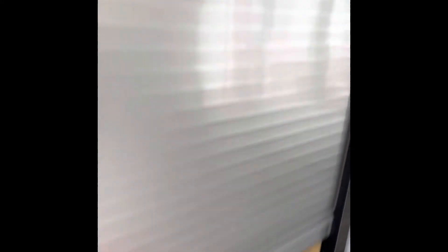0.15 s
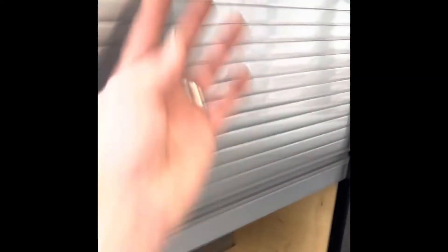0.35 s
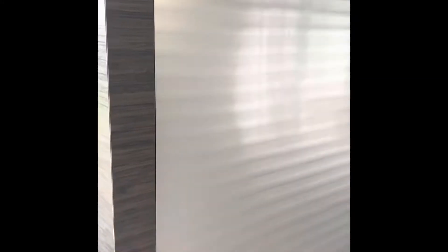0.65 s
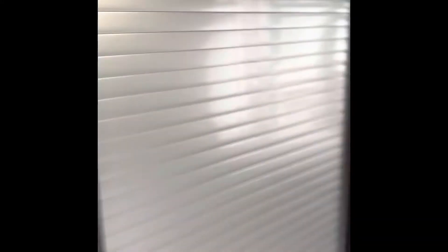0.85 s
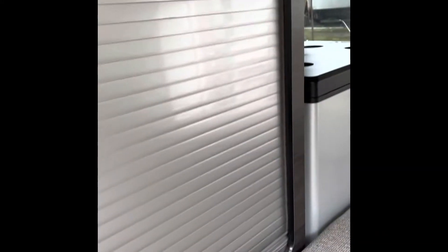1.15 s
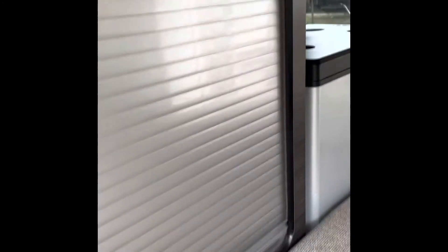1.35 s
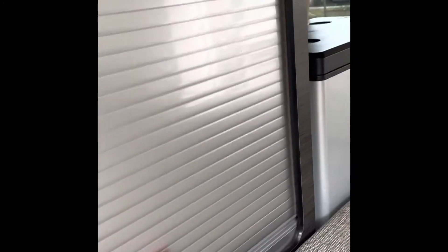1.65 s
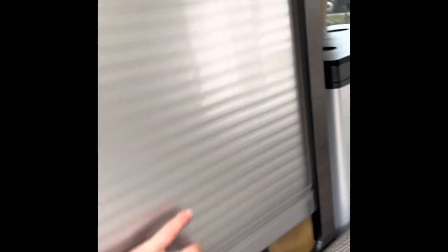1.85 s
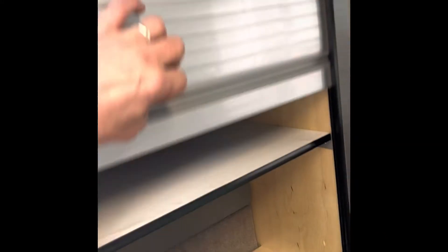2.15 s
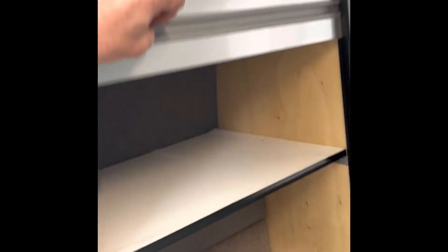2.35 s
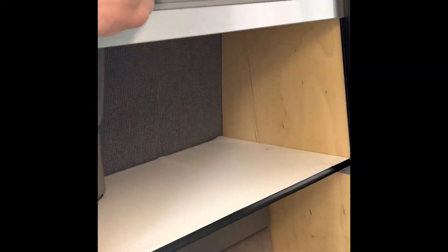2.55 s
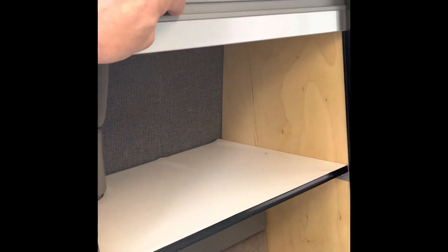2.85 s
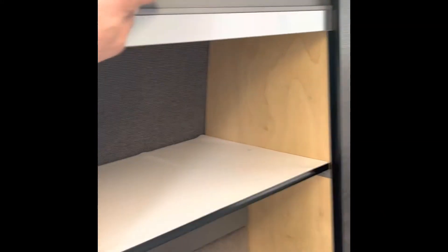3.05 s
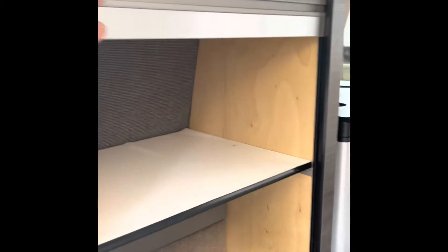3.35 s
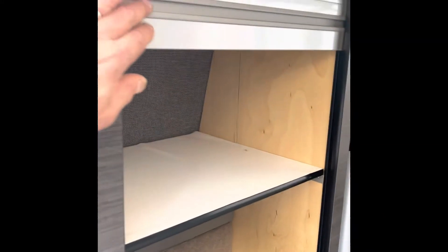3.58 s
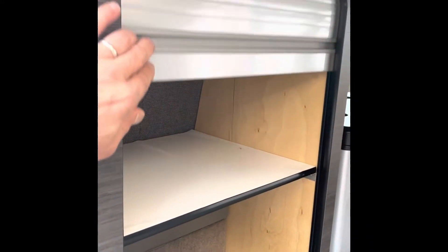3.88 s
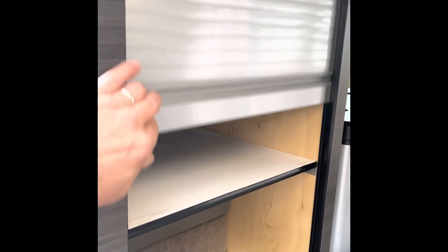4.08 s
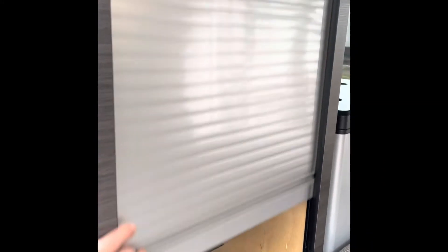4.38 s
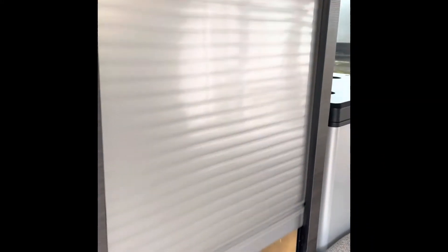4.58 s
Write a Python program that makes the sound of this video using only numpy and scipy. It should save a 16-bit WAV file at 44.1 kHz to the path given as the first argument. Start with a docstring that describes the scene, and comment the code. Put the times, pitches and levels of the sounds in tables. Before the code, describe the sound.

Inside a small camper, a hand pulls a cabinet's slatted roll-up door down in two quick, rattling slides, and it shuts with a sharp, woody knock. Fingers tap lightly on it, then the slats rush upward with a hissing clatter. After a short pause with faint clicks, the door slides down again more gently. The sound is close and fairly dry, over a soft low outdoor rumble.

```python
"""Inside a small camper, a hand works the slatted roll-up door of a wooden cabinet, close by. A low outdoor
rumble fills the cabin. The door slides three times: its slats hiss and clatter along their tracks, shaking the
door and the cabinet and making the air inside hum. The door knocks shut once and fingers tap and thump on it:
each blow rings the wood, while slat edges and fingernails click and the slats now and then squeal briefly."""
import sys
import numpy as np
from scipy import signal
from scipy.fft import rfft, irfft, next_fast_len
from scipy.io import wavfile
from scipy.ndimage import uniform_filter1d

SR = 44100
rng = np.random.default_rng(int(sys.argv[2]) if len(sys.argv) > 2 else 0)


def transcribe(signal):
    """Save signal, clipped to [-1, 1], as a 16-bit WAV file at the path in sys.argv[1]."""
    frames = np.atleast_2d(signal).T
    limited = np.clip(frames, -1, 1)
    pcm = np.round(limited * 32767).astype(np.int16)
    wavfile.write(sys.argv[1], SR, pcm)


N = 208363


def gain_of(db):
    """Turns decibels into a volume factor."""
    return 10 ** (np.asarray(db) / 20)


def evened(x):
    """Scales a sound to an average (rms) level of 1."""
    return x / np.sqrt(np.mean(x ** 2) + 1e-20)


def level_at(points, hz):
    """Looks up a (frequency, level) table, with octaves evenly spaced."""
    point_hz, db = np.transpose(points)
    return np.interp(np.log(hz + 1), np.log(point_hz + 1), db)


def follow(rows):
    """Turns a table that starts with a time column into one curve per other column."""
    times, *columns = np.transpose(rows)
    return (np.interp(np.arange(N) / SR, times, column) for column in columns)


def add(mix, start_s, sound):
    """Mixes a sound in at a given time."""
    part = mix[round(start_s * SR):][:len(sound)]
    part += sound[:len(part)]


def coloured(x, points):
    """Shapes a sound's tone by a (frequency, level) table, cutting the bass below its first row."""
    hz = np.fft.rfftfreq(len(x), 1 / SR)
    closed = [(points[0][0] / 2, points[0][1] - 30)] + list(points)
    return irfft(rfft(x) * gain_of(level_at(closed, hz)), len(x))


def resonant(x, modes):
    """Lets a sound ring an object's modes, its natural tones; narrow ones ring longer."""
    out = np.zeros(len(x))
    for k, (hz, width, db) in enumerate(modes):
        pole = np.exp(-np.pi * width / SR + 2j * np.pi * hz / SR)
        out += (-1) ** k * gain_of(db) * signal.lfilter([1 - abs(pole)], [1, -pole], x).imag
    return out


def gliding(x, modes, pitch):
    """Rings modes whose frequencies are all multiplied by one pitch curve."""
    out, turns = np.zeros(N), np.cumsum(pitch) / SR
    for k, (hz, width, db) in enumerate(modes):
        spin = np.exp(2j * np.pi * hz * turns)
        decay = np.exp(-np.pi * width / SR)
        ring = spin * signal.lfilter([1 - decay], [1, -decay], x / spin)
        out += (-1) ** k * gain_of(db) * ring.imag
    return out


def wander(per_s):
    """A smooth random curve that changes about per_s times a second."""
    span = max(int(SR / per_s), 1)
    return evened(uniform_filter1d(uniform_filter1d(rng.standard_normal(N), span), span))


def grit(per_s, spread_db):
    """Tiny random impacts of uneven size."""
    size = gain_of(spread_db * np.minimum(rng.exponential(1, N), 5)) * rng.choice([-1., 1.], N)
    return evened(size * (rng.random(N) < per_s / SR))


def patchy(x, depth_db):
    """Makes different frequency bands swell and sag on their own."""
    bands = signal.stft(x, nperseg=512, noverlap=384)[2]
    patches = uniform_filter1d(rng.standard_normal(bands.shape[::-1]), size=14, axis=0)  # over time
    patches = uniform_filter1d(patches, size=5, axis=1)  # over frequency
    bands = bands * gain_of(depth_db * evened(patches).T)
    return evened(signal.istft(bands, nperseg=512, noverlap=384)[1][:N])


def cabin_rumble():
    """Low outdoor noise fills the cabin, swaying slightly in level."""
    # tone of the rumble: (frequency [Hz], level [dB])
    rumble_tone = [(30, -19.5), (55, 7.5), (100, 1), (290, -15.5), (1030, -18.5), (1600, -26),
                   (2300, -32.5), (3000, -41), (5000, -48.5), (8000, -68.5), (12000, -53), (15700, -93)]
    return gain_of(-43.5 + wander(15)) * evened(coloured(rng.standard_normal(N), rumble_tone))


def wall_echoes(x, fade_s):
    """The cabin walls scatter a sound into a short tail that falls 60 dB in fade_s."""
    t = np.arange(SR // 8) / SR
    tail = rng.standard_normal(len(t)) * gain_of(-60 * t / fade_s)
    return signal.oaconvolve(x, tail / np.linalg.norm(tail))[:N]


def door_motion():
    """Hiss level, dullness and treble level as the hand slides the door or brushes it at rest."""
    # one list per slide (down in two pulls, up, down): (time [s], hiss [dB], dullness [0-1], treble [dB])
    slides = [
        [(0, -41.5, 0.5, -47), (.07, -39.5, 0.3, -51), (.16, -38.5, 0.4, -46), (.22, -34, 0.6, -48),
         (.27, -44.5, 0.84, -57.5), (.33, -58.5, 0.8, -68.5), (.45, -54, 0.1, -59.5), (.56, -46.5, 0.65, -56.5),
         (.635, -47, 0.95, -54.5), (.65, -43, 0.9, -52.5), (.72, -37.5, 0.06, -46), (.75, -32, .8, -42),
         (.786, -33, 0.7, -52), (.803, -34.5, .95, -62), (.822, -41, .95, -63), (.852, -59, 0.93, -73.5),
         (1.0, -64.5, 1, -75)],
        [(1.62, -53.5, 0.1, -65), (1.72, -50.5, 0, -58), (1.74, -41, 0.7, -56.5), (1.89, -37.5, 0.55, -45.5),
         (2.0, -32, 0, -43.5), (2.14, -37, 0.8, -51), (2.29, -34.5, 0.7, -49.5), (2.36, -37, 0.8, -50.5),
         (2.42, -42, 0.87, -57), (2.5, -59, 1, -69.5)],
        [(3.7, -58.5, 0.72, -75), (3.8, -56, 0.8, -66), (3.88, -52, 0.6, -62), (4.1, -49, 0.7, -57.5),
         (4.14, -39.5, 0.3, -52), (4.23, -37, 0, -51), (4.28, -39.5, 0.2, -53), (4.335, -48, 0.4, -52.5),
         (4.36, -44.5, 0.84, -54), (4.44, -55, 0.6, -58), (4.56, -47.5, 0.1, -56.5), (4.72, -50.5, 0.8, -54.5)],
    ]
    # light brushes of the hand: (centre time [s], half length [s], hiss [dB], treble [dB])
    brushes = [(1.178, 0.091, -58.5, -66.5), (1.403, 0.074, -60, -65.5), (1.566, 0.051, -50.5, -60),
               (2.557, 0.13, -63.5, -69.5), (2.797, 0.017, -59.5, -63.5), (2.87, 0.12, -71, -79.5),
               (3.006, 0.031, -76, -70), (3.079, 0.094, -77.5, -82), (3.312, 0.032, -61.5, -67),
               (3.608, 0.034, -60.5, -78)]
    rest_db, rest_dullness, settle_s = -103, 0.28, 0.06
    rest = (rest_db, rest_dullness, rest_db)
    t, rows = np.arange(N) / SR, []
    for slide in slides:
        rows += [(slide[0][0] - settle_s, *rest), *slide, (slide[-1][0] + settle_s, *rest)]
    hiss_db, dullness, treble_db = follow(rows)
    for centre_s, half_s, brush_db, brush_treble_db in brushes:
        swell_db = -12 * (np.sqrt(1 + ((t - centre_s) / half_s) ** 2) - 1)  # round top, gentle sides
        hiss_db = np.maximum(hiss_db, brush_db + swell_db)
        treble_db = np.maximum(treble_db, brush_treble_db + swell_db)
    return hiss_db, np.clip(dullness, 0, 1), treble_db


def shaken(hiss_db, level_db, share, fall_db_per_s):
    """How strongly wood shakes: it partly follows the hiss, builds up late and fades at its own speed."""
    full_hiss_db, build_s = -38, 0.083
    span = int(build_s * SR)
    late_db = uniform_filter1d(hiss_db, span, origin=(span - 1) // 2)
    driven_db = level_db + share * (late_db - full_hiss_db)
    fall_db = np.arange(N) / SR * fall_db_per_s
    return gain_of(np.maximum.accumulate(driven_db + fall_db) - fall_db)


def shaking_wood(hiss_db):
    """Each slat joint bumping past makes the door drum and the cabinet boom."""
    # modes of the hanging door: (base frequency [Hz], width [Hz], level [dB])
    door_modes = [(103.2, 23, 5.5), (127.6, 13, 4.5), (158.4, 18, 3.5), (209.8, 36, -5), (251.2, 19, -4.5),
                  (282, 180, -24.5), (418.8, 32, -9), (402, 110, -12.5)]
    # modes of the cabinet: (frequency [Hz], width [Hz], level [dB])
    cabinet_modes = [(43.66, 21, -2), (50.14, 3.6, 4), (74.6, 15, -5.5)]
    # the door rings higher when less of it hangs down:
    # (time [s], door boost [dB], cabinet boost [dB], door pitch [factor])
    shaking = [(0, 1, 12.5, 0.8), (.2, -2, 7, .9), (.4, -2, 3.5, 1.08), (.72, 4, 5, 0.91),
               (.82, 2.5, 16.5, 0.75), (1.0, 10.5, 10, 1.1), (1.5, -4, -4.5, 1.12), (1.8, 4.5, 11, .92),
               (1.87, 0, -1, 1.24), (2.0, 1, 8.5, 1.06), (2.15, -6, -7, 1.14), (2.3, -3, 5, 1.25),
               (2.6, -15, -3, 1.4), (3.6, -1.5, 8.5, 1.2), (3.92, -2, 3, 1.1), (4.15, -2, -12, 1.2),
               (4.27, -3, 3.5, 0.96), (4.45, 0.5, -2.5, 1.12), (4.72, -4.5, 2, 1.01)]
    door_db, cabinet_db, pitch = follow(shaking)
    drum = evened(gliding(grit(250, spread_db=3.5), door_modes, pitch)) * gain_of(1.5 * wander(25))
    boom = evened(resonant(grit(200, spread_db=5.5), cabinet_modes)) * gain_of(5.5 * wander(11))
    return (drum * shaken(hiss_db, door_db - 30.5, share=0.7, fall_db_per_s=112)
            + boom * shaken(hiss_db, cabinet_db - 40.5, share=0.23, fall_db_per_s=72))


def cabinet_hum():
    """The sliding sets the air inside the cabinet humming."""
    # the hollow hum: (time [s], pitch [Hz], level against the hiss [dB])
    hum = [(0, 400, -7), (.8, 403, -7), (1.8, 426, -7), (2.1, 393, -23), (2.5, 380, -12.5),
           (3.8, 430.5, -11), (3.95, 425, -6), (4.05, 421.7, 3.5), (4.15, 415.4, -16), (4.25, 437, -0.5),
           (4.4, 447, 4), (4.72, 402, -15)]
    hz, db = follow(hum)
    width_hz = 70.7
    return gain_of(db) * evened(gliding(grit(400, spread_db=7), [(1, width_hz, 0)], hz))


def scrape(tone):
    """Rubbing surfaces make thousands of tiny slips a second, in uneven gusts."""
    slips = grit(6000, spread_db=3.5) + 0.92 * rng.standard_normal(N)
    gusts = gain_of(wander(55) + 0.82 * wander(330))
    return evened(coloured(slips * gusts, tone))


def rustle(treble_db):
    """The thin, high grain of the rubbing."""
    # tone of the rustle: (frequency [Hz], level [dB])
    rustle_tone = [(3500, 5.5), (5500, -1), (7500, 6), (10500, -3), (14000, 3.5), (15700, -45)]
    return gain_of(treble_db) * scrape(rustle_tone)


def slat_clatter(dullness):
    """Slats rattle, their ring wandering as they bend round the roll."""
    # modes of one slat: (base frequency [Hz], width [Hz], level [dB])
    slat_modes = [(828, 110, 11.5), (1117.5, 34, 16.5), (1487, 70.5, 12), (1904, 90, 8.5), (2210, 73, 10),
                  (2764, 82, 5.5), (3063, 71, -0.5), (3600, 100, 8.5), (3980, 52, -1), (4280, 54, 0),
                  (4890, 89, 10.5)]
    # no two slats ring alike: (pitch [factor])
    tunings = (.955, .985, 1.015, 1.045)
    drift, muffle_hz = 0.027, 2566
    clatter = np.zeros(N)
    for tuning in tunings:
        ring = gliding(grit(400, spread_db=2), slat_modes, tuning * (1 + drift * wander(6.44)))
        clatter += ring * gain_of(4.8 * wander(9))
    clatter = evened(clatter)
    highs = signal.sosfilt(signal.butter(2, muffle_hz, "high", fs=SR, output="sos"), clatter)
    return clatter - dullness * highs  # slats pressed on the roll lose their high ring


def sliding_slats(dullness):
    """Slat ends scrape and clatter along the tracks."""
    # bright hiss of slats skating freely: (frequency [Hz], level [dB])
    skating = [(300, 5), (1100, -6), (1900, -2), (2700, -7.5), (3700, -1.5), (4500, -4), (5300, -5.5),
               (6000, -18), (7500, -9.5), (10000, -21.5), (15700, -42.5)]
    # dull hiss of slats dragging round the roll: (frequency [Hz], level [dB])
    dragging = [(300, 12), (700, 2), (1100, 4.5), (1600, -9), (2300, -8), (2900, -9.5), (4000, -21),
                (6000, -30), (8000, -23.5), (15700, -50)]
    hiss = np.sqrt(1 - dullness) * scrape(skating) + np.sqrt(dullness) * scrape(dragging)
    return patchy(hiss + gain_of(-4.5) * slat_clatter(dullness), depth_db=2)


def clicks():
    """Slat edges and fingernails hit, and slats give brief squeals near 3.7 kHz: each is a sharp crack or
    squeak, partly pitched by the slat, then a faint rattle."""
    # each click: (time [s], peak [dB], pitch [Hz], pitched share [0-1], time to fade 60 dB [s])
    contacts = [(0.025, -32, 3720, .98, 0.067), (0.052, -26.5, 3700, .98, 0.04),
                (.209, -19, 830, 0.17, 0.021), (.62, -44, 2520, .2, 0.023), (0.644, -24, 2060, .02, 0.043),
                (0.7258, -18, 1760, 0.1, 0.024), (0.742, -23, 4200, 0.9, 0.037),
                (0.748, -11, 2400, 0.9, 0.012), (0.7498, -4.5, 4730, 0.76, 0.009),
                (.7512, -7.5, 3440, 0.7, 0.01), (.7515, -10.5, 477, 0.65, 0.022),
                (0.752, -6.5, 930, 1, 0.012), (0.7615, -10, 3100, 0.25, 0.045),
                (0.796, -22.5, 1500, .7, 0.056), (1.04, -31, 3180, 0.8, 0.01), (1.041, -44, 1350, .8, .015),
                (1.076, -47.5, 4800, 0.3, .02), (1.171, -34, 1000, 0.23, 0.02),
                (1.271, -50, 4800, 0.8, .025), (1.312, -38, 990, 0.6, 0.015),
                (1.375, -42, 3600, 0.56, 0.012), (1.4, -26, 2930, 1, 0.015), (1.406, -38, 3150, 0.95, .03),
                (1.572, -24.5, 2860, 0.6, 0.026), (1.573, -32.5, 900, 0.85, 0.016),
                (1.598, -35, 776, 0.84, 0.049), (1.7255, -27.5, 3700, 1, 0.035),
                (1.772, -31, 3620, 1, 0.044), (1.848, -28, 3680, 0.93, 0.024), (1.9, -27.5, 3660, 0.4, .04),
                (1.951, -19.5, 1080, 0, 0.039), (2.699, -43.5, 3080, 0, 0.046),
                (3.297, -36, 3370, 0.42, 0.035), (3.302, -38, 1035, 0.86, .06),
                (3.321, -42.5, 3370, 0.8, 0.035), (3.545, -44.5, 3630, .6, 0.022),
                (3.556, -28, 3900, 0, 0.032), (3.558, -36, 400, 1, 0.055),
                (4.533, -27.5, 3330, 0.53, 0.035), (4.54, -45, 2860, 0.8, 0.021),
                (4.696, -30, 3700, 0.66, 0.021)]
    # tone of the crack: (frequency [Hz], level [dB])
    crack_tone = [(500, 6.5), (1500, -2.5), (2200, -0.5), (3000, 2.5), (3700, 0), (5000, 0), (7500, -10),
                  (10500, -14), (14000, -13.5), (15700, -32)]
    out, t = np.zeros(N), np.arange(6000) / SR
    for start_s, db, hz, share, fade_s in contacts:
        rise_s = 0.0006086 + 0.73 * fade_s ** 2  # longer clicks start softer
        rise = (1 - np.exp(-t / rise_s)) ** 2
        fall = gain_of(-60 * t / fade_s)
        rattle = gain_of(-33 - 60 * t / 0.029)
        burst = rng.standard_normal(len(t)) * rise * (fall + rattle)
        burst[int(2 * rise_s * SR)] += 1.8  # the first contact
        modes = [(hz, 750, 0), (hz * 1.8, 800, -7)]
        pitched = evened(resonant(resonant(burst, modes), modes))  # twice, for a clearer pitch
        crack = evened(coloured(burst, crack_tone) * (t < 0.12))
        click = (1 - share) * crack + share * pitched
        add(out, start_s, gain_of(db) * click / abs(click).max())
    return out


def struck_wood(modes, brightness, lag, length):
    """High bending waves travel faster through wood, so low tones arrive and swell later."""
    t = np.arange(SR // 2) / SR
    out = np.zeros(len(t))
    for hz, db, fade_s in modes:
        age = np.maximum(t - lag * (hz ** -0.5 - 0.03), 0)
        swell = 1 - np.exp(-age * hz * 6.2)
        tilt_db = 6.76 * (brightness - 3) * np.log2(hz / 200)
        fall_db = 60 * (age / (length * fade_s)) ** 1.15  # speeds up as the slats press together
        out += gain_of(db + tilt_db - fall_db) * swell * np.sin(2 * np.pi * hz * age)
    return out / abs(out).max()


def thumps():
    """Finger blows and the closing knock ring both the door and the cabinet."""
    # each blow: (time [s], door peak [dB], cabinet peak [dB], brightness [higher is sharper],
    # lag from distance along the slats [factor], ring length [factor], door pitch [factor])
    blows = [(0.087, -20.5, -44, 0.9, 0.059, 0.35, 1.1), (0.208, -14.5, -27, 1.46, 0.072, 0.25, 1.26),
             (0.253, -26.5, -21.5, 0.44, 0.17, 0.27, 1.78), (0.647, -23, -34, 0.15, 0.11, 0.23, 1.37),
             (0.7554, -1.5, -3, 1.78, 0.2, 0.42, 1.01), (0.798, -13, -35, 2, 0.12, 0.43, 1.1),
             (1.309, -22, -53, 0.33, 0.15, 0.23, 1.25), (1.373, -18, -55, 0.5, 0.11, 0.36, 1.07),
             (1.572, -15, -47, 1.1, 0.088, 0.29, 1.2), (1.6, -26, -26.5, 1.3, 0.095, 1, 0.97),
             (1.832, -22.5, -32, 0.58, 0.13, 0.64, 1.05), (1.957, -14.5, -29, 0.58, 0.091, 0.51, 0.92),
             (1.995, -24, -24, 0.7, 0.093, 0.46, 0.92), (2.06, -32, -35, 0.72, 0.15, 0.25, 0.85),
             (3.295, -41, -55.5, 2.5, 0.094, 0.43, 0.81), (3.558, -27, -38, 1.3, 0.092, 0.3, 1.29),
             (4.227, -24, -48, 0.91, 0.081, 0.28, 0.81), (4.257, -35, -34, 1.1, 0.11, 0.22, 0.68),
             (4.347, -41, -30, 0.68, 0.05, 0.35, 1.3), (4.532, -25.5, -44, 0.2, 0.1, 0.31, 0.97)]
    # cabinet modes, then door modes: (base frequency [Hz], base level [dB], base time to fade 60 dB [s])
    wood_modes = ([(57, 2, 0.42), (73.6, -14, 0.25)], [(97.7, -6, 0.26), (118.1, -4, 0.19),
                  (150.1, 2, 0.22), (171.7, -2, 0.2), (225, -4, 0.09), (258.6, 1, 0.16), (314, -4, 0.22),
                  (403.4, 1, 0.3), (518, -9, 0.11), (787, 0.5, 0.07), (973, 4, 0.026), (1300, -28, 0.0093)])
    cabinet_modes, door_modes = wood_modes
    out = np.zeros(N)
    for start_s, door_db, cabinet_db, brightness, lag, length, pitch in blows:
        tuned = [(hz * pitch, db, fade_s) for hz, db, fade_s in door_modes]
        add(out, start_s, gain_of(door_db) * struck_wood(tuned, brightness, lag, length))
        # the stiff cabinet carries a blow faster than the slats
        boom = struck_wood(cabinet_modes, brightness=0.53, lag=0.75 * lag, length=length)
        add(out, start_s, gain_of(cabinet_db) * boom)
    return out


def scene():
    """Mixes in stereo: the sides differ in phase and level, and get the echoes with opposite signs."""
    # how far the left side's wave runs ahead: (frequency [Hz], phase [radians])
    left_lead = [(0, 0), (600, -.4), (1400, 0), (2670, 2.5), (4200, 1.4), (5500, 2), (6050, 3.14),
                 (14500, 15.7), (17000, 19.4)]
    # stereo balance: (frequency [Hz], left minus right [dB])
    balance = [(60, -.4), (250, -.9), (600, -3.5), (1300, -.6), (4000, -2), (8000, 0)]
    # tone of the wall echoes: (frequency [Hz], level [dB])
    echo_tone = [(60, -26), (200, -19), (640, -11), (1400, -12), (2400, -5), (3000, -3), (5000, -5),
                 (6000, -10), (15000, -12)]
    hiss_db, dullness, treble_db = door_motion()
    sliding = gain_of(hiss_db) * (sliding_slats(dullness) + cabinet_hum())
    steady = sliding + shaking_wood(hiss_db) + rustle(treble_db) + cabin_rumble()
    hits = thumps() + clicks()
    echoes = wall_echoes(steady, fade_s=0.12) + gain_of(-7) * wall_echoes(hits, fade_s=0.03)
    size = next_fast_len(N + SR // 4)
    hz = np.fft.rfftfreq(size, 1 / SR)
    direct = rfft(steady + hits, size)
    scattered = rfft(echoes, size) * gain_of(level_at(echo_tone, hz))
    lead = np.interp(hz, *np.transpose(left_lead))
    pan = gain_of(level_at(balance, hz) / 2) * np.exp(0.5j * lead)  # half goes to each side
    return irfft(np.array([(direct + scattered) * pan, (direct - scattered) / pan]), size)[:, :N]


def record(dry):
    """The microphone loses the deepest bass and the highest treble."""
    low_hz, high_hz = 44, 15750
    thinned = signal.sosfilt(signal.butter(4, low_hz, "high", fs=SR, output="sos"), dry)
    treble_cut = signal.firwin(511, high_hz, window=("kaiser", 9), fs=SR)
    return signal.oaconvolve(thinned, treble_cut[None], "same")


dry = scene()
out = record(dry)
transcribe(out)
```